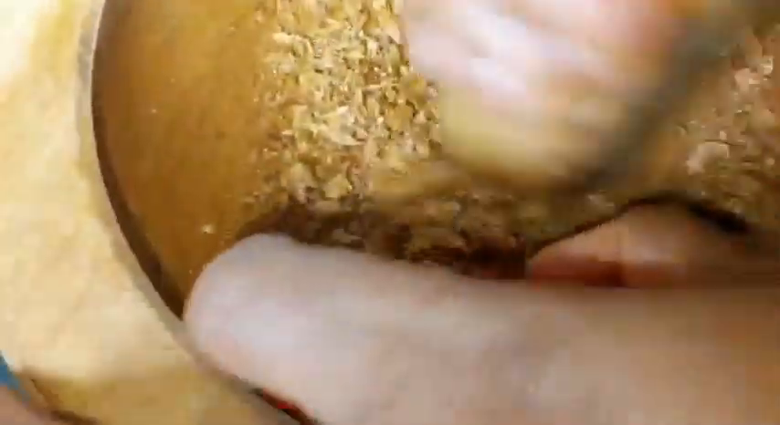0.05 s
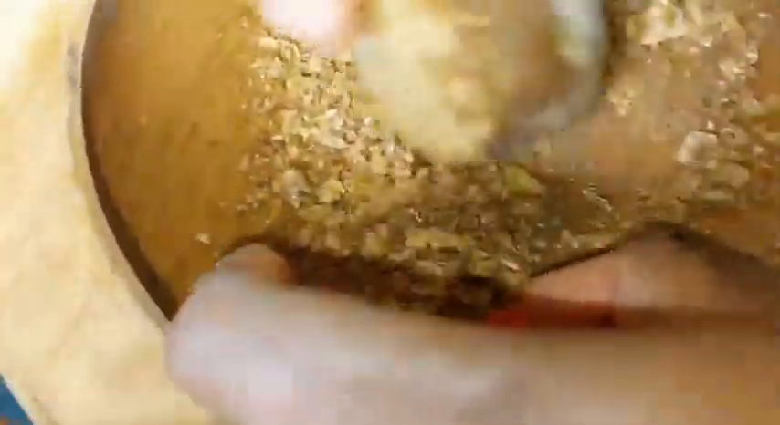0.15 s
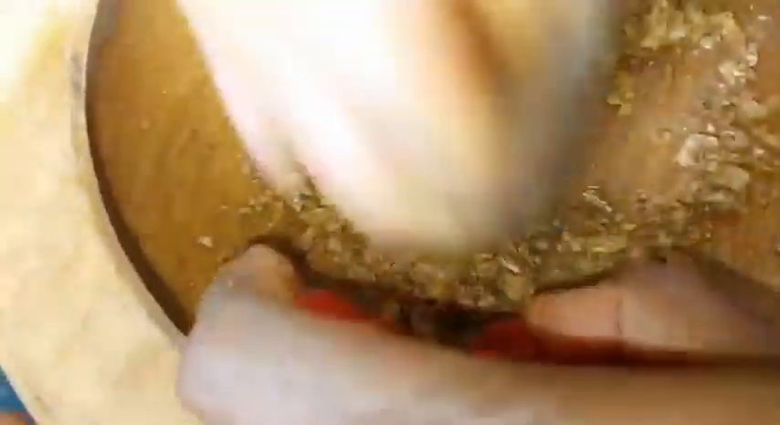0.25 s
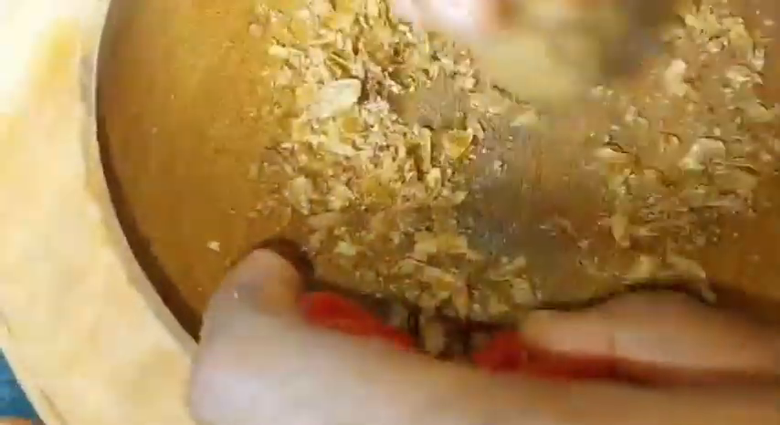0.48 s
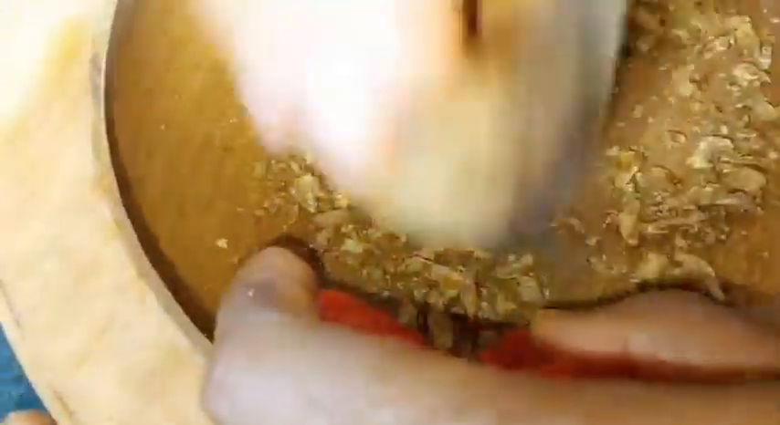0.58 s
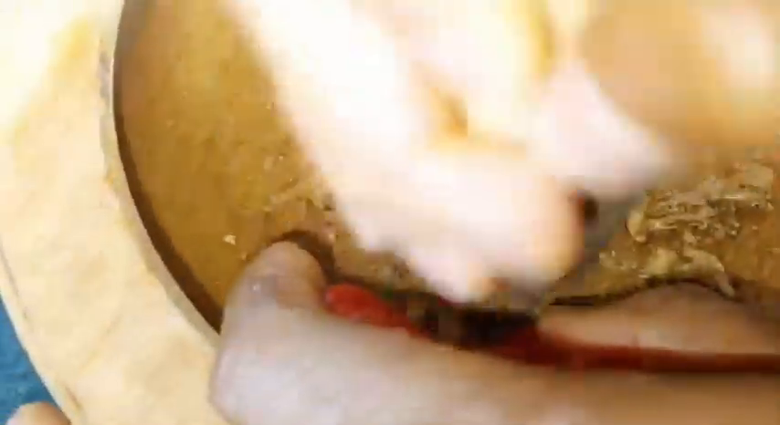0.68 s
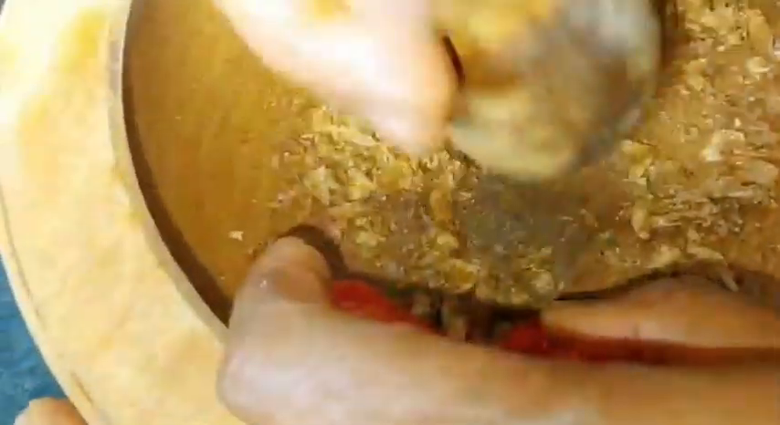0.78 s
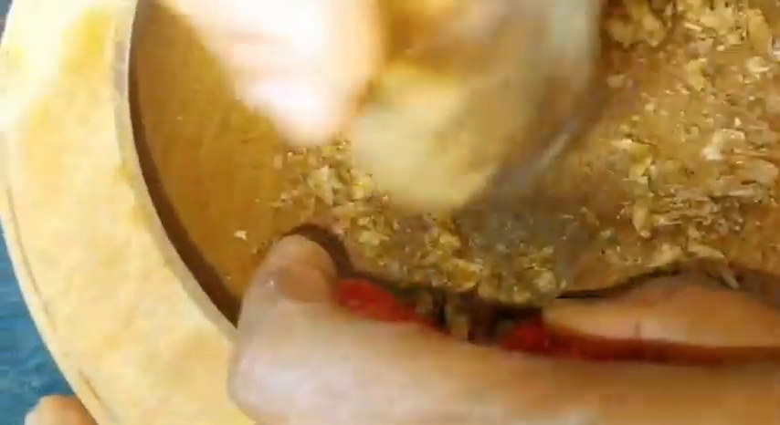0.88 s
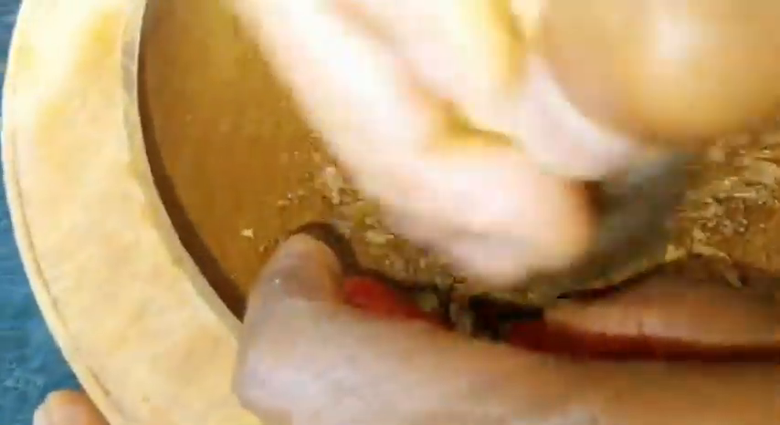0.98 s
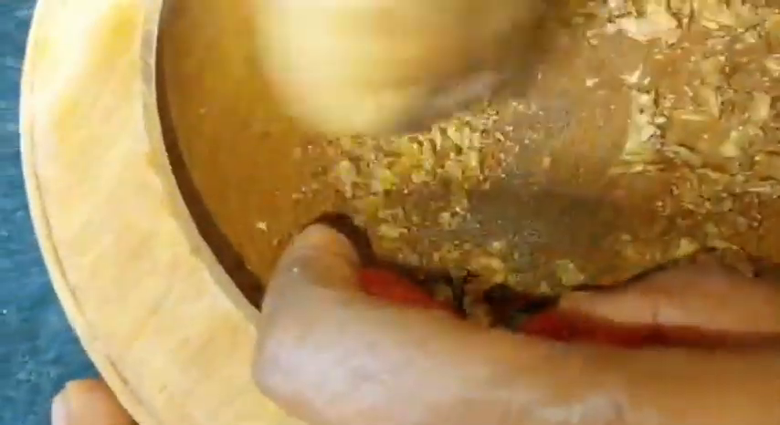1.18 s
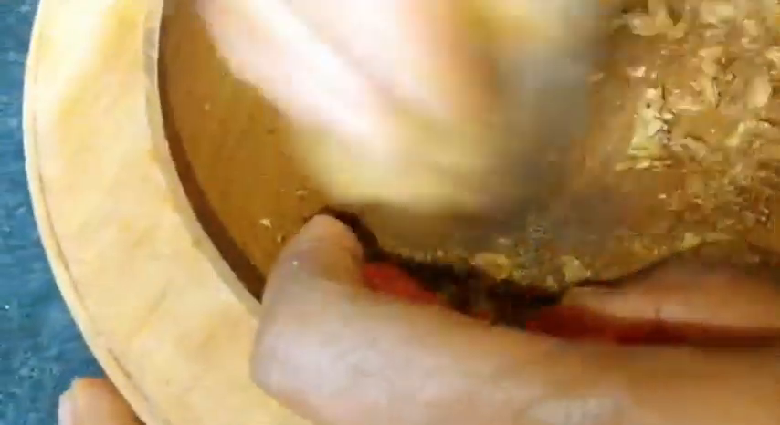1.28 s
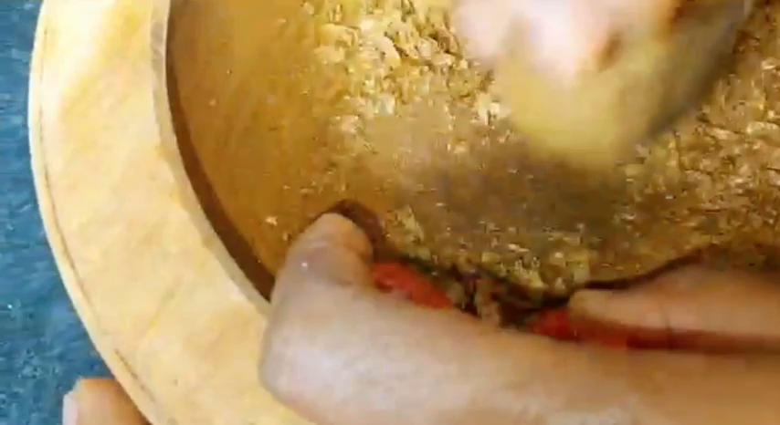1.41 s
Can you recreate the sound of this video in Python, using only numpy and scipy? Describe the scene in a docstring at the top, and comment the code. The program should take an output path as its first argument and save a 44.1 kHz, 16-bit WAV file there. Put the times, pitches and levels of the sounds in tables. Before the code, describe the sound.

Close up in a small room, four evenly spaced wooden pounding blows thud deep and hollow, crushing brittle flakes; the pestle drags out between strokes, the third blow is duller, and quiet hiss continues beneath.

```python
"""A small kitchen, microphone close to a hand-held wooden mortar: a wooden pestle pounds dry flakes, four strokes.
Each stroke brushes into the flakes (random grains), thumps the mortar on its support (low swelling sines),
knocks the wood and sets the bowl ringing (damped sines), and crushes the flakes with a bright burst.
Then the pestle drags out through them. A short diffuse tail answers, over low room rumble and steady hiss."""
import sys
import numpy as np
from scipy import signal
from scipy.fft import rfft, irfft, next_fast_len
from scipy.io import wavfile

SR = 44100
rng = np.random.default_rng(int(sys.argv[2]) if len(sys.argv) > 2 else 0)


def dump(signal):
    """Clip the signal to [-1, 1] and save it as 16-bit WAV at the path in sys.argv[1]."""
    limited = np.clip(np.atleast_2d(signal).T, -1, 1)
    pcm = np.round(limited * 32767).astype(np.int16)
    wavfile.write(sys.argv[1], SR, pcm)


N = 63945
T = np.arange(N) / SR  # s

# strokes of the pestle: t/s, thump level/dB, knock level/dB, knock cut-off f/Hz, knock length factor,
# crunch level/dB, crunch and ring tilt/(dB per octave), ring level/dB
STROKES = [(.204, -9.5, -8, 1150, 0.96, -20.5, 0, -26), (0.5394, -10, -8, 980, 0.96, -23.5, 0.45, -26.5),
           (0.8319, -11, -12.5, 562, 0.95, -30.5, -0.13, -30.5),
           (1.138, -14, -5, 1420, 0.64, -25.5, -1.5, -31.5)]
KNOCK_LEAD_S = 0.0018  # wood and flakes sound before the mortar moves


def amp(db):
    """Decibels to gain."""
    return 10 ** (np.asarray(db) / 20)


def unit(x):
    """Scale to rms 1."""
    return x / np.sqrt(np.mean(x ** 2) + 1e-20)


def along(points, hz):
    """(Hz, value) points read on a log frequency axis."""
    f, v = np.transpose(points)
    return np.interp(np.log(hz + 1), np.log(f + 1), v)


def filtered(x, response):
    """Multiply the spectrum of x by a response that depends on frequency."""
    size = next_fast_len(N + SR // 2)
    hz = np.fft.rfftfreq(size, 1 / SR)
    return irfft(rfft(x, size) * response(hz), size)[..., :N]


def stereo(pair, spectrum, alike):
    """Colour two unrelated signals and blend them into left and right of a given likeness."""
    def mid_side_gains(hz):
        angle = np.arccos(np.clip(along(alike, hz), -1, 1)) / 2
        return amp(along(spectrum, hz)) * [np.cos(angle), np.sin(angle)]

    mid, side = filtered(pair, mid_side_gains)
    return np.array([mid + side, mid - side])


def pan(db):
    """Left and right gains for a level difference."""
    return amp(np.array([[db], [-db]]) / 2)


def decay(t, t60):
    """Exponential fade by 60 dB in t60 seconds."""
    return np.exp(-np.log(1000) * t / t60)


def mode(start, hz, t60, attack):
    """A damped sine with a soft start."""
    t = np.maximum(T - start, 0)
    return np.sin(2 * np.pi * hz * t) * decay(t, t60) * (1 - np.exp(-t / attack))


def swell(start, hz, rise):
    """A low mode whose envelope swells to its peak in the rise time, then fades."""
    t = np.maximum(T - start, 0)
    return t / rise * np.exp(1 - t / rise) * np.sin(2 * np.pi * hz * t)


def flakes(spectrum):
    """Dense tiny fractures of uneven size, rms 1."""
    # how alike the flakes reach left and right: f/Hz, likeness (0-1)
    flakes_alike = [(300, 0.6), (1500, 0.13), (5000, 0.035)]
    grains_per_s, spread_db = 9000, 5
    breaks = rng.random((2, N)) < grains_per_s / SR
    size_db = spread_db * np.clip(rng.standard_normal(N), -2, 2)
    sizes = rng.standard_normal((2, N)) * amp(size_db)
    return unit(stereo(breaks * sizes, spectrum, flakes_alike))


def resonant(x):
    """Colour a sound with many close resonances of the wood, drawn anew at each contact, rms 1."""
    spacing_hz, spread_db = 170, 6
    full_hz = 4070  # below this the resonances stand out less
    knots_db = spread_db * np.clip(rng.standard_normal(1024), -2, 2)

    def response(hz):
        depth = np.minimum(hz / full_hz, 1)
        return amp(depth * np.interp(hz / spacing_hz, np.arange(len(knots_db)), knots_db))

    return unit(filtered(x, response))


def background():
    """Low room rumble and steady hiss, made of coloured noise."""
    # colour of the room floor: f/Hz, relative level/dB
    floor_spectrum = [(25, -26), (55, 5), (110, 5), (200, -1), (400, -1.5), (600, -9.5), (1200, -15.5),
                      (2000, -10), (5000, -18.5), (9000, -15.5), (13000, -18), (16000, -24.5)]
    # left-right likeness of the floor: f/Hz, likeness (0-1)
    floor_alike = [(100, 0.99), (500, 0.67), (2000, 0.13), (8000, 0.069)]
    level_db = -53.5
    noise = rng.standard_normal((2, N))
    return amp(level_db) * unit(stereo(noise, floor_spectrum, floor_alike))


def kitchen(x):
    """A short diffuse tail from nearby walls: noise that fades at its own rate in each band."""
    # reverberation time of the kitchen: f/Hz, t60/s
    room_t60 = [(100, 0.3), (500, 0.29), (2000, 0.24), (10000, 0.21)]
    # colour of the tail: f/Hz, level/dB
    room_send = [(60, -41), (130, -11.5), (300, -16), (1000, -13.5), (4000, -8), (12000, 1.5)]
    # left-right likeness of the tail: f/Hz, likeness (0-1)
    room_alike = [(100, 0.98), (400, 0.67), (1500, 0.067)]
    delay_s = 0.007
    hz, t, bands = signal.stft(rng.standard_normal((2, SR // 2)), SR, nperseg=256)
    fading = bands * decay(t, along(room_t60, hz)[:, None])
    tail = signal.istft(fading, SR, nperseg=256)[1]
    tail = tail / np.linalg.norm(tail[0])
    tail = np.pad(tail, ((0, 0), (int(delay_s * SR), 0)))
    mono = x.mean(0)[None]
    echoes = signal.fftconvolve(mono, tail, axes=1)[:, :N]
    return stereo(echoes, room_send, room_alike)


def earlier_stroke():
    """A dull rustle fading at the start, the end of an earlier stroke, as fading grains."""
    # colour of the fading rustle: f/Hz, relative level/dB
    earlier_spectrum = [(25, -12), (60, -0.5), (170, 2.5), (260, -13), (450, -8), (1000, -21.5), (2500, -35),
                        (16000, -55)]
    fade_s, level_db = 0.036, -42
    return amp(level_db) * np.exp(-(T / fade_s) ** 2) * flakes(earlier_spectrum)


def rub():
    """A short rub of wood on the wall, a brief swell of coloured grains."""
    # colour of wood on wood: f/Hz, relative level/dB
    rub_spectrum = [(300, -23), (900, -16), (1350, 6), (1800, -17), (2600, -17), (5000, -50), (16000, -48)]
    start_s, width_s, level_db = 1.449, 0.011, -48.5
    pressure = np.exp(-((T - start_s) / width_s) ** 2)
    return amp(level_db) * pressure * flakes(rub_spectrum)


def rocking():
    """The mortar rocks on its support, heard as low swells."""
    # rocks of the mortar: t/s, level/dB
    handling = [(0.956, -48), (1.258, -36.5)]
    rock_hz, rise_s = 104.8, 0.017
    return sum(amp(db) * swell(s, rock_hz, rise_s) for s, db in handling)


def dragging():
    """The pestle scrapes through the flakes as its pressure comes and goes, rubs the wall and rocks the mortar."""
    # drags through the flakes: t/s, rise/s, fall/s, level/dB
    drags = [(.265, 0.039, 0.032, -41), (.355, 0.029, 0.012, -47.5), (0.632, 0.032, 0.017, -35.5),
             (0.903, 0.068, 0.032, -40), (0.977, 0.025, 0.014, -48), (1.198, 0.039, 0.046, -39),
             (1.448, .01, 0.017, -59)]
    # colour of the scrape: f/Hz, relative level/dB
    scrape_spectrum = [(150, 5), (400, 5), (800, -3), (1150, -7.5), (1750, 3.5), (2400, -7), (3200, -9),
                       (6000, -19.5), (10000, -31), (16000, -37)]
    pressure = np.zeros(N)
    for s, rise, fall, db in drags:
        width = np.where(T < s, rise, fall)
        pressure += amp(db) * np.exp(-((T - s) / width) ** 2)
    return pressure * flakes(scrape_spectrum) + rub() + rocking()


def thump(start):
    """The mortar bounces on its support in several low modes that swell and fade, joined by a brief knock of
    the wood."""
    # mortar on its support, plus a brief knock of the wood at 344 Hz: f/Hz, relative level/dB, time to swell/s
    support_modes = [(53.4, -26, 0.04), (110.26, -14.5, .028), (107.5, 1, 0.0071), (137.5, -2.5, 0.007),
                     (169.6, -1, 0.0091), (197.2, -6.5, 0.0093), (210.5, -18.5, 0.026), (344, 1, 0.002)]
    scatter_db = 0.29
    return sum(amp(db + rng.normal(0, scatter_db)) * swell(start, hz, rise) for hz, db, rise in support_modes)


def knock(start, cutoff_hz, length):
    """The wood's dull damped modes knock; a thicker bed of flakes dulls them."""
    # dull modes of the wood: f/Hz, relative level/dB, t60/s before the length factor, left-right level/dB
    wood_modes = [(275.7, -2, 0.074, 2.5), (322.5, 2, 0.05, -10), (396.2, -3, 0.07, -10.5),
                  (448, -7, 0.03, 12), (570, 0, 0.062, 4), (684.2, 1.5, 0.053, -8), (753, -4, 0.062, 18),
                  (918, -17, 0.21, -5.5), (1054, -14.5, 0.072, -6), (1144, -6.5, 0.062, 5.5),
                  (1288, -7, 0.078, -0.5)]
    attack_s = 0.0026
    ear_shift_s = 0.00013  # each mode comes early at one ear and late at the other
    out = np.zeros((2, N))
    for hz, db, t60, side_db in wood_modes:
        shift = ear_shift_s * rng.choice([-1, 1]) * np.array([[1], [-1]])
        arrival = start - KNOCK_LEAD_S + shift
        cushion = 1 / np.sqrt(1 + (hz / cutoff_hz) ** 4)
        level = amp(db + rng.normal(0, 1)) * cushion
        out -= level * pan(side_db) * mode(arrival, hz, t60 * length, attack_s)
    return out


def ring(start, tilt_db):
    """The bowl's bright modes build up while the flakes are crushed, then fade and are damped."""
    # bright modes of the bowl: f/Hz, relative level/dB, undamped t60/s, left-right level/dB
    bowl_modes = [(1750, -3, 0.017, -3.5), (2060, 1.5, 0.15, 4.5), (2796, -14, 0.21, 8.5),
                  (2897, -16, 0.055, -21), (3563, -16, 0.2, 3), (3915, -22, 0.13, 6),
                  (4380, -11.5, 0.032, 3), (4750, -30, 0.023, 0), (6170, -16, 0.047, -4.5),
                  (7238, -25.5, 0.1, -13), (8060, -24.5, 0.092, -1), (8920, -22.5, 0.13, 0),
                  (11000, -31.5, 0.045, 8), (12900, -32, .05, 11)]
    build_s = 0.016
    settle_s, settled_t60_s = 0.04, 0.062  # the pestle settles into the flakes and damps the bowl
    out, t = np.zeros((2, N)), T - start
    build = np.clip(t / build_s, 0, 1)
    damping = decay(np.maximum(t - settle_s, 0), settled_t60_s)
    for hz, db, t60, side_db in bowl_modes:
        phase = rng.uniform(0, 2 * np.pi) + rng.normal(0, 0.93, (2, 1))
        scatter_db = rng.normal(0, 1.5)
        level = amp(db + scatter_db + tilt_db * np.log2(hz / 2000))
        fade = decay(np.maximum(t - build_s, 0), t60)
        out += level * pan(side_db) * build * fade * damping * np.sin(2 * np.pi * hz * t + phase)
    return out


def crunch(start, tilt_db):
    """Grains of flakes rustle under the falling pestle, then break loudest at first contact and fade."""
    # colour of the crunch before its tilt: f/Hz, relative level/dB
    crunch_spectrum = [(150, 6.5), (400, 7), (900, -3), (1400, -6.5), (1900, 2), (2500, -13), (4500, -15.5),
                       (7000, -32.5), (12000, -34.5), (16000, -47)]
    brush_db, brush_rise_s = -5.5, 0.0076  # flakes touched before the blow
    contact_db, ease_s, crush_t60_s = 4, 0.017, 0.094  # extra level at contact, time to lose it, then the fade
    t = T - start + KNOCK_LEAD_S
    brush = amp(brush_db) * np.exp(np.minimum(t, 0) / brush_rise_s)
    contact = amp(contact_db * np.clip(1 - t / ease_s, 0, 1))
    crush = contact * decay(np.maximum(t - ease_s, 0), crush_t60_s)
    tilted = [(hz, db + tilt_db * np.log2(hz)) for hz, db in crunch_spectrum]
    return np.where(t < 0, brush, crush) * resonant(flakes(tilted))


def shatter(start, tilt_db):
    """The last flakes burst brightly just after the blow, a short swell of high grains."""
    # colour of the burst: f/Hz, relative level/dB
    shatter_spectrum = [(300, -22), (1500, -2), (3000, -4), (4600, 2), (5300, -8.5), (6300, 3.5),
                        (7000, -20), (9500, -13.5), (13000, -16), (16000, -24)]
    delay_s, width_s, level_db = 0.016, 0.0067, -12.5
    tilt_octaves = 4.7  # how far above the body of the crunch the burst lies
    burst = np.exp(-((T - start - delay_s) / width_s) ** 2)
    return amp(level_db + tilt_db * tilt_octaves) * burst * resonant(flakes(shatter_spectrum))


def pounding():
    """Every stroke thumps the mortar, knocks the wood and crunches the flakes."""
    out = np.zeros((2, N))
    for s, thump_db, knock_db, cutoff_hz, length, crunch_db, tilt_db, _ in STROKES:
        out += amp(thump_db) * thump(s)
        out += amp(knock_db) * knock(s, cutoff_hz, length)
        out += amp(crunch_db) * (crunch(s, tilt_db) + shatter(s, tilt_db))
    return out


def scene():
    """The mortar close to the microphone, in the kitchen."""
    ring_room_db = -7  # the ring leaves the bowl straight towards the microphone
    mortar = pounding() + dragging() + earlier_stroke()
    bowl = sum(amp(ring_db) * ring(s, tilt_db) for s, *_, tilt_db, ring_db in STROKES)
    room = kitchen(mortar + amp(ring_room_db) * bowl)
    return mortar + bowl + room + background()


def record(dry):
    """The recorder cuts the deepest bass, rounds off the highest peaks and keeps nothing above its band limit."""
    bass_corner_hz, top_hz = 15.5, 15900  # two equal bass cuts share the corner
    thinned = filtered(dry, lambda hz: (1j * hz / (1j * hz + bass_corner_hz)) ** 2)
    limited = thinned / (1 + np.abs(thinned) ** 8) ** (1 / 8)
    return filtered(limited, lambda hz: hz < top_hz)


dry = scene()
out = record(dry)
dump(out)
```